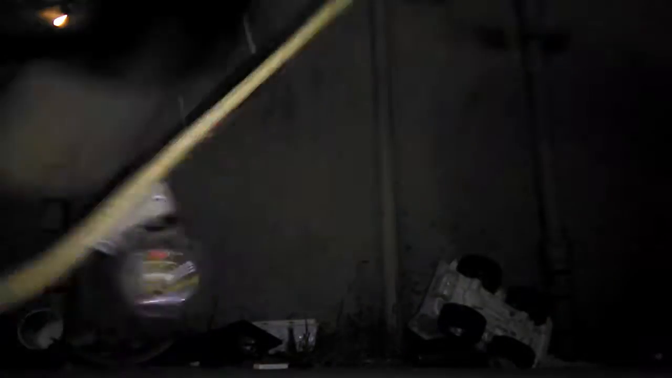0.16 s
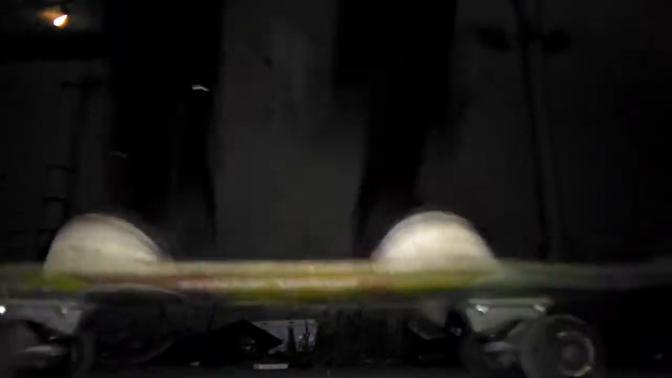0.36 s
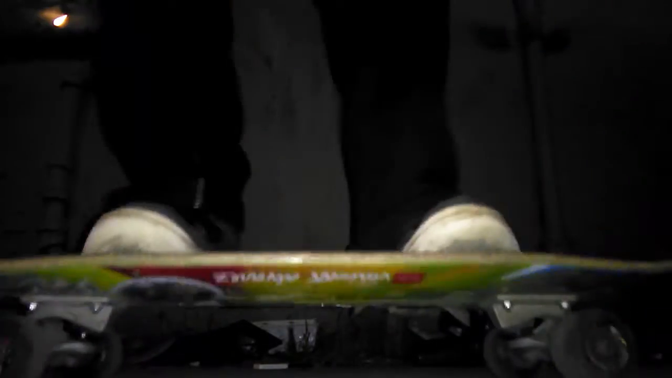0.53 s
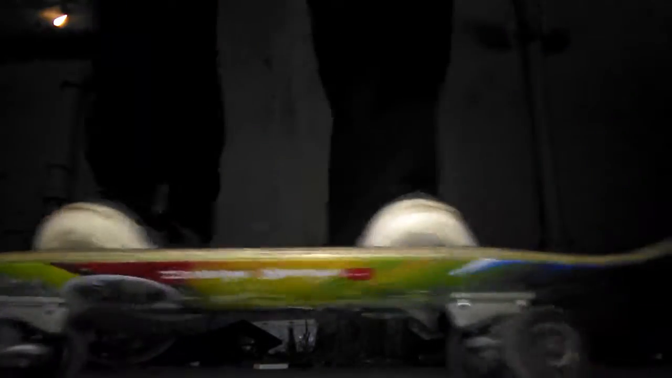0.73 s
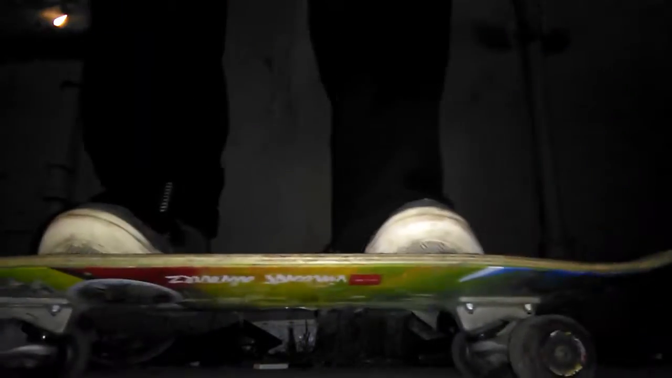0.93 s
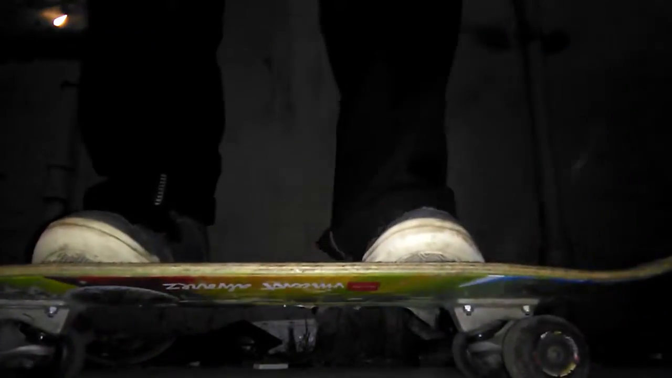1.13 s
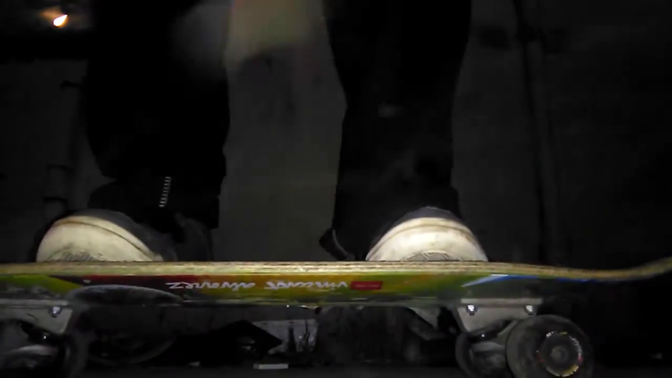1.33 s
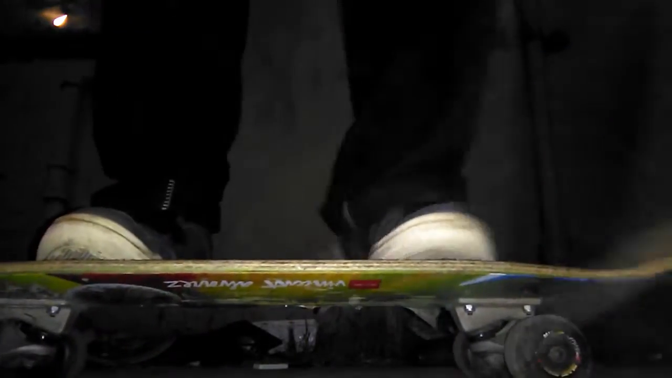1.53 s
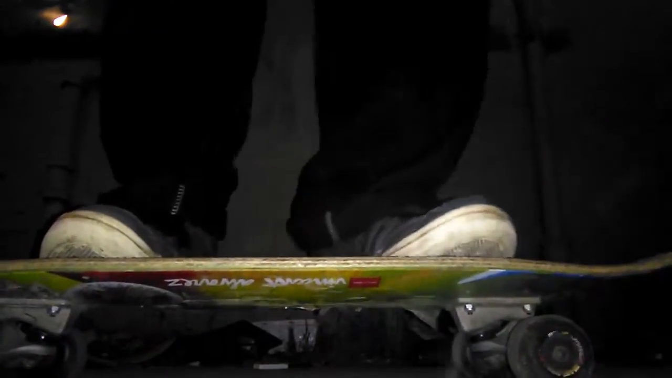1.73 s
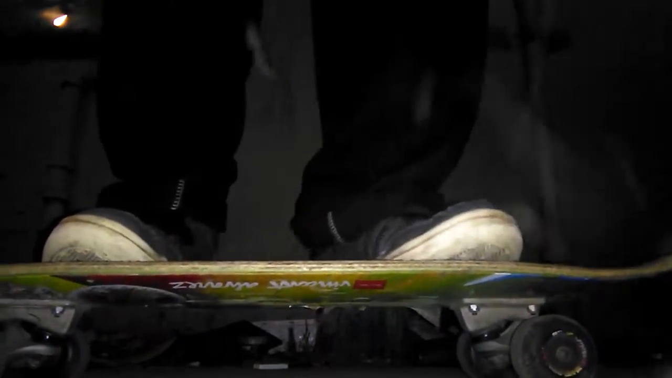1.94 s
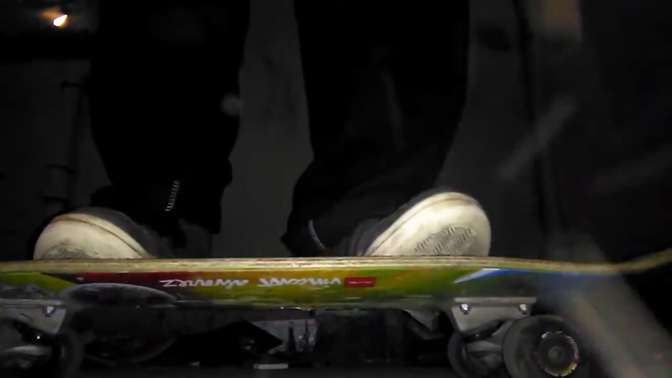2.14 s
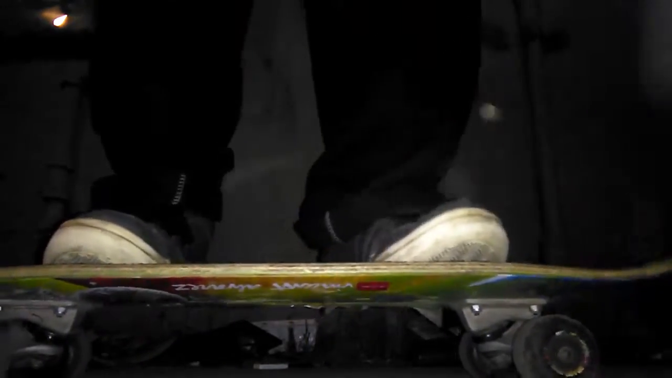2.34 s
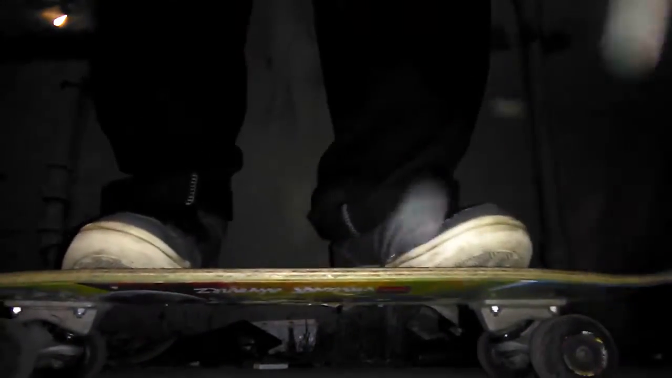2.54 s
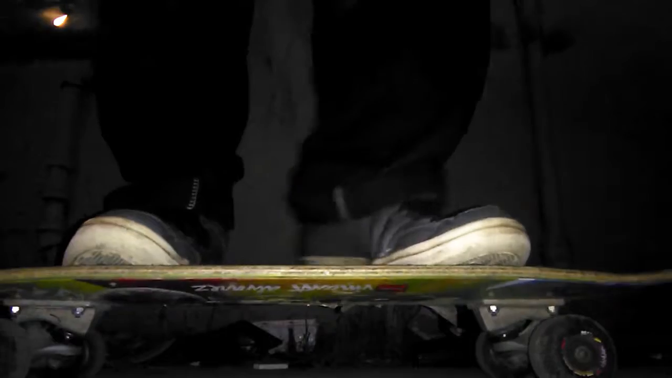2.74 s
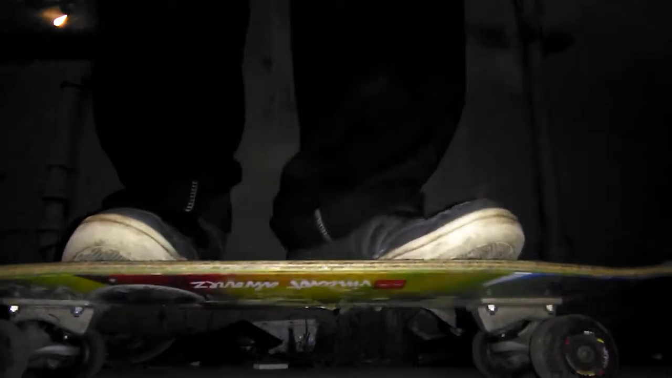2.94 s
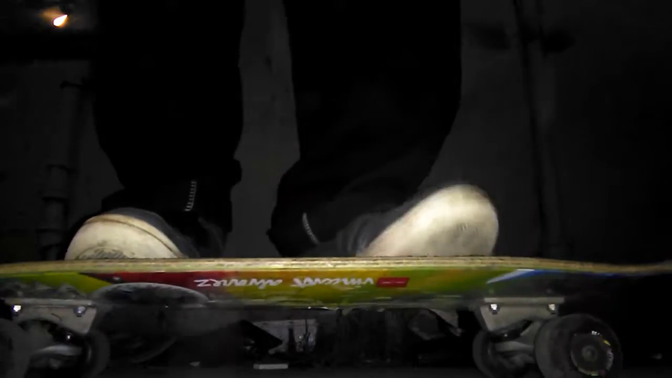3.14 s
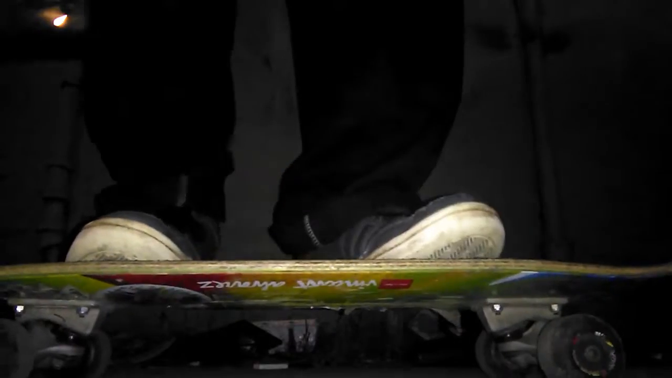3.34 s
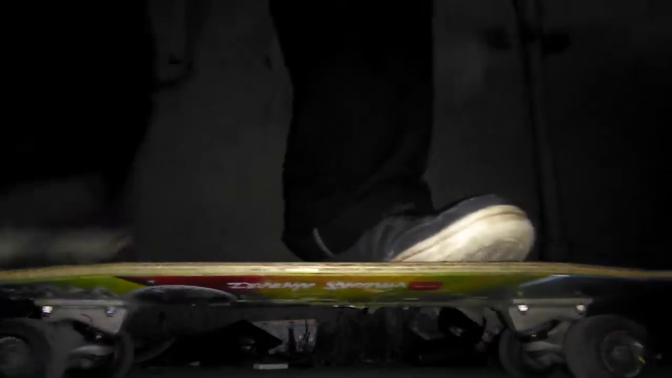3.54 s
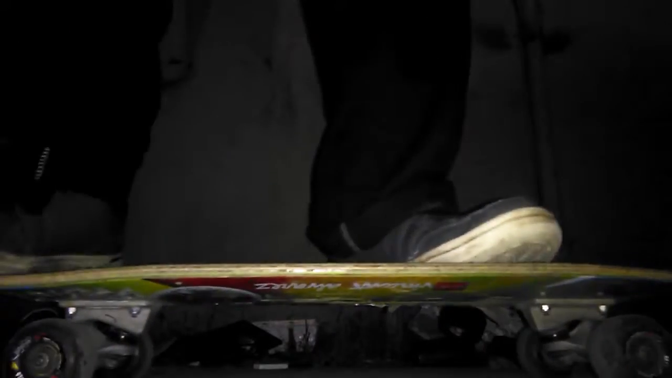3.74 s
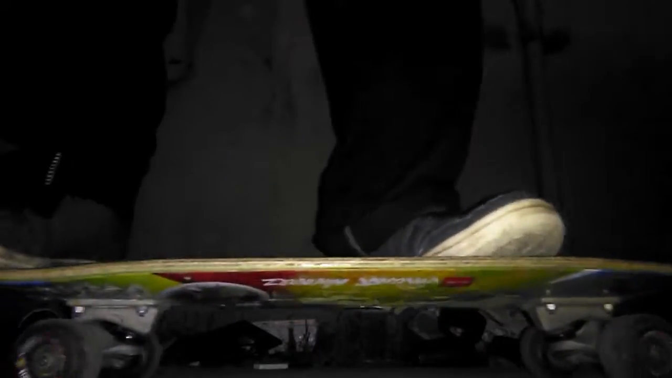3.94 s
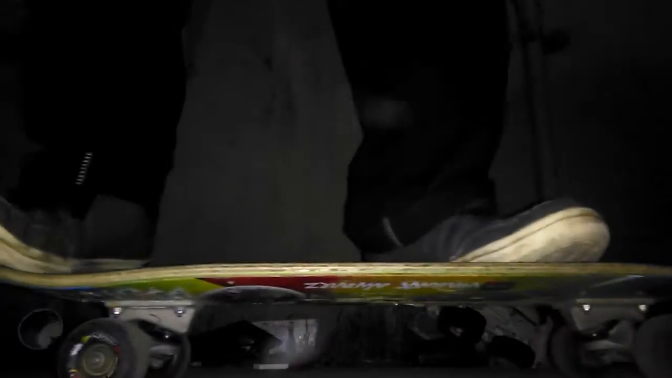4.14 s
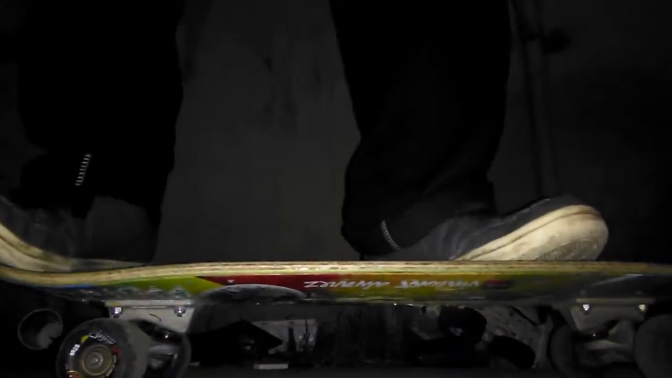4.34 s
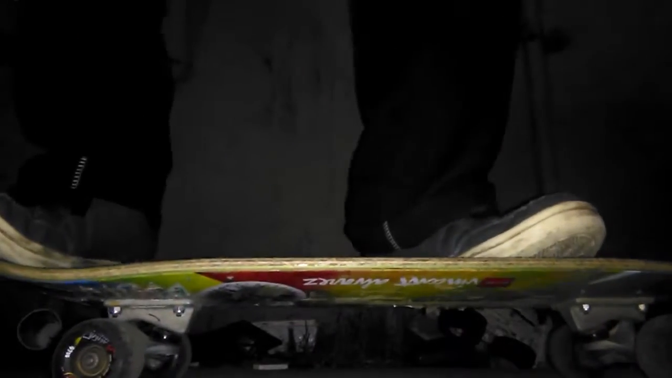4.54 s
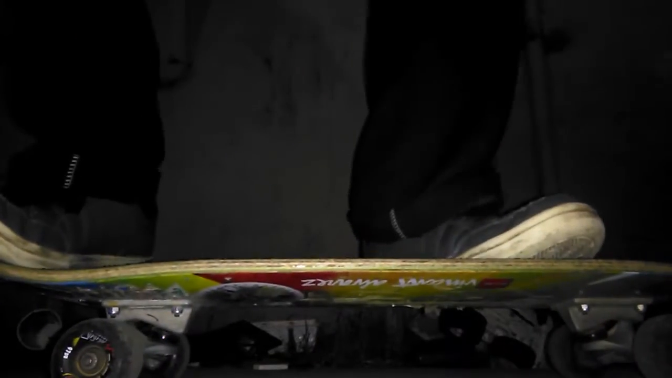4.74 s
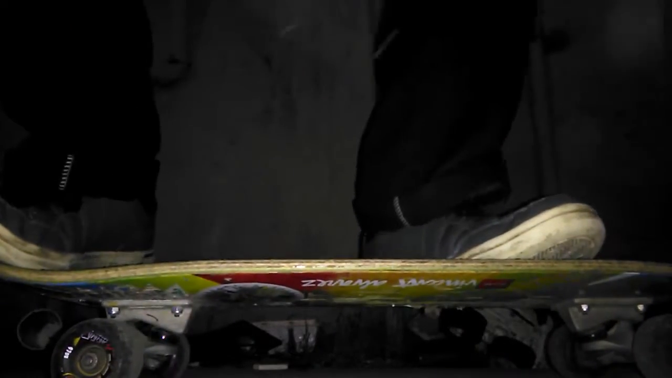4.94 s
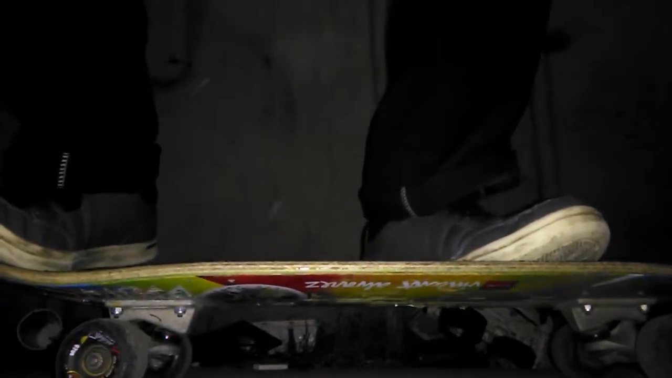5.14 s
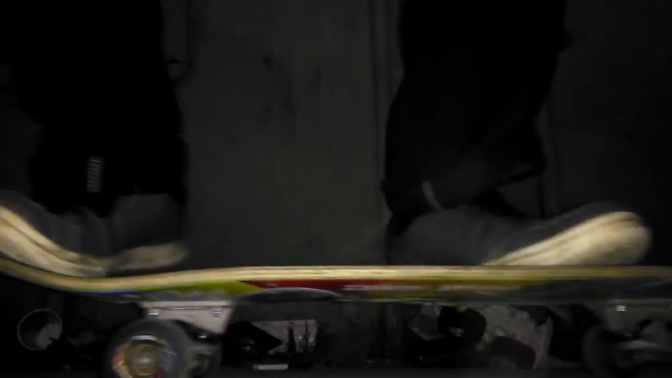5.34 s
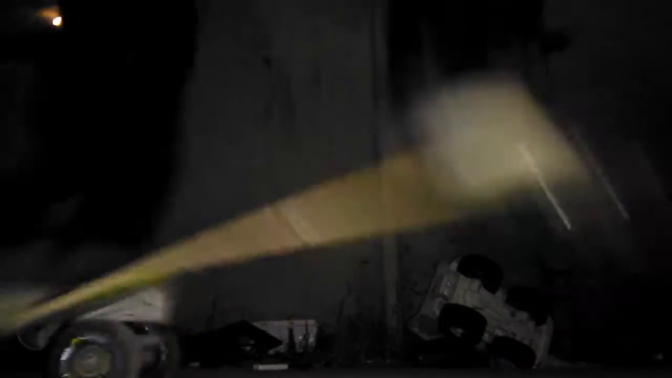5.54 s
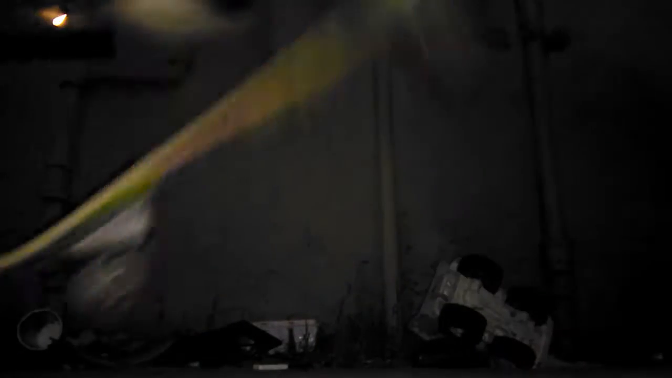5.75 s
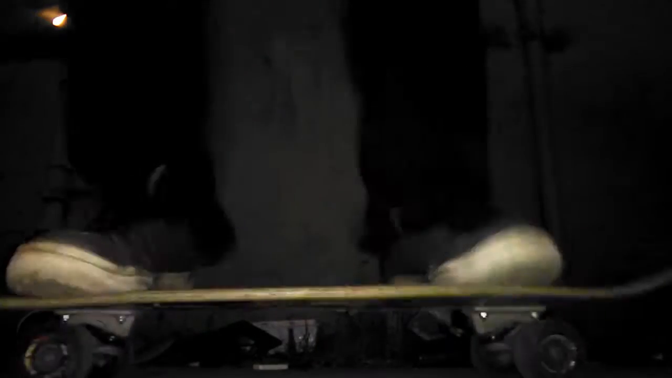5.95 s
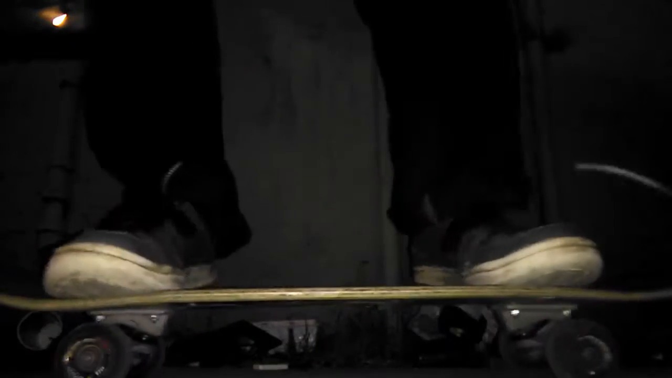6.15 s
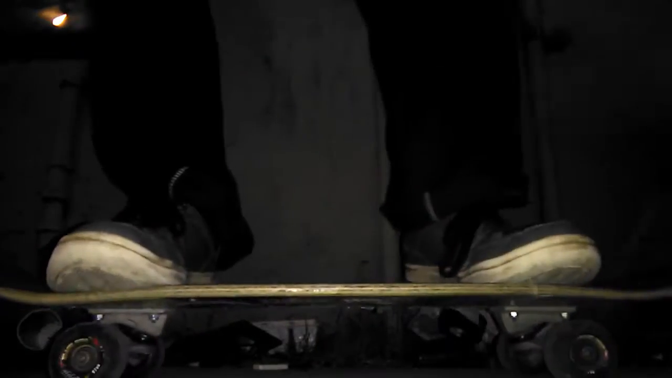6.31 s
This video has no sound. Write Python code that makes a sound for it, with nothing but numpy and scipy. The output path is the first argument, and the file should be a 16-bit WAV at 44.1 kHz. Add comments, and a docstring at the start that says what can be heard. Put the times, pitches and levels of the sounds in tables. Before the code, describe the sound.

A skateboarder jumps two ollies in a small room, with cracking tail pops, booming wheel landings and soles scuffing on grip tape between.

```python
"""A small bare room with a hard floor, heard from wheel height: a skateboarder jumps two ollies.
Each time the board's tail cracks down, then the wheels slam back in a quick clatter that sets the room
booming. In between, the trucks (the axle mounts) knock, and rubber soles scuff and squeak on the
board's rough grip tape. A dull rush of air lies underneath, and a limiter flattens the slams."""
import sys
import numpy as np
from scipy import signal
from scipy.fft import rfft, irfft, next_fast_len
from scipy.io import wavfile
from scipy.ndimage import uniform_filter1d, minimum_filter1d, map_coordinates

SR = 44100
rng = np.random.default_rng(int(sys.argv[2]) if len(sys.argv) > 2 else 0)


def pcm_store(signal):
    """Save signal as 16-bit PCM."""
    levels = np.round(np.clip(np.atleast_2d(signal), -1, 1) * 32767)
    wavfile.write(sys.argv[1], SR, levels.astype(np.int16).T)


N = 281358

# Soles sliding on the grip tape: (start [s], length [s], level [dB])
SCUFF_STROKES = [(0.0, 0.071, -35), (0.077, 0.15, -36), (0.698, 0.16, -39.5), (1.066, 0.11, -52),
                 (1.146, 0.14, -40.5), (1.554, 0.18, -43), (1.926, 0.085, -52.5), (2.088, 0.089, -44.5),
                 (2.318, 0.3, -46.5), (2.746, 0.13, -39.5), (2.914, 0.11, -53), (3.096, 0.094, -42.5),
                 (3.431, 0.15, -53), (3.632, 0.1, -49), (3.763, 0.048, -52.5), (3.884, 0.051, -48.5),
                 (4.121, 0.12, -45), (4.564, 0.093, -53.5), (5.186, 0.24, -48), (5.473, 0.11, -31),
                 (5.593, 0.092, -42.5), (6.187, 0.08, -48)]
# Trucks knocking as the rider's weight shifts: (time [s], level [dB])
TRUCK_HITS = [(0.038, -25), (0.356, -34.5), (0.847, -23), (3.637, -25.5), (3.9413, -27), (5.512, -25.5),
              (5.568, -24.5), (5.588, -25.5), (6.207, -28)]
# The tail hitting the floor: (time [s], clack [dB], crack [dB], boom [dB], rebound delay [s])
TAIL_HITS = [(0.13, -3, -11.5, -15, 0.042), (5.677, -3, -13.5, -24, 0.026)]
# Grit and loose hardware: (time [s], relative level [dB])
GRIT_TICKS = [(0.2666, -18.5), (0.569, -11.5), (0.573, -15), (0.609, -17), (1.6132, -24), (2.2356, -34.5),
              (5.4026, -23), (5.84, -23), (6.116, -20.5), (6.162, -26)]
# The board landing: (time [s], level [dB], centre of the boom under the feet [Hz])
TOUCHDOWNS = [(0.384, -2, 283), (5.92, -1.5, 517)]
# The rocking board setting a wheel down: (time [s], level [dB], click [dB])
WHEEL_HITS = [(0.6754, -19.5, -21), (0.687, -20.5, -26), (0.696, -17.5, -14), (0.702, -17, -40),
              (0.8595, -21.5, -26)]
# Rubber sticking and slipping: (start [s], length [s], first pitch [Hz], last pitch [Hz], level [dB])
RUBBER_SLIPS = [(1.121, 0.068, 776, 978, -39.5), (3.884, 0.045, 1170, 924, -47.5),
                (4.129, 0.082, 1091, 1174, -39.5), (5.444, 0.089, 738, 1134, -36)]

# The tone of each sound, from bass to treble: (frequency [Hz], relative level [dB])
AIR_TONE = [(22, -19), (65, 5), (110, 2.5), (230, -0.5), (500, -5.5), (680, -3), (830, 0.5), (1020, -1.5),
            (1200, -16), (1900, -18), (3000, -31.5), (4500, -35), (7500, -30), (14000, -39.5)]
RASP_TONE = [(500, -30.5), (1200, -11), (1900, -3), (3200, -3), (4500, -4), (5700, -3), (6800, -13),
             (10000, -23), (14000, -41)]
FIZZ_TONE = [(3000, -15), (6500, -6), (8500, -5), (11000, -14.5), (14500, -25.5)]
KNOCK_TONE = [(60, -6), (250, 0.5), (520, 2), (950, -8), (1700, -5), (3200, -18.5), (8000, -46)]
CRACK_TONE = [(800, -15), (2500, -2.5), (4500, -4), (8200, -0.5), (11000, -8), (14500, -16.5)]
CLACK_TONE = [(28, -28), (58, -0.5), (140, -13), (300, -1.5), (600, -0.5), (1100, -2), (1800, -2.5),
              (2500, -5.5), (3300, -13.5), (6000, -21.5), (10000, -28), (15000, -57.5)]
SQUEAK_TONE = [(1200, -31), (2100, 1), (3000, -3), (4300, -5), (5850, 4.5), (7000, -7), (10000, -19)]
# Stiff resonances of the wooden deck and trucks: (frequency [Hz], width [Hz], boost [dB])
DECK_PEAKS = [(1023, 19.3, 1), (1296, 18, 4), (1537, 110, 2.5), (1864, 50, 4), (2246, 48, 7),
              (3570, 160, 2.5), (4100, 136, 4), (5510, 200, 3.5), (7580, 110, 7)]
# Low notes at which board and room ring: (frequency [Hz], relative level [dB], time to fade 60 dB [s])
BOOM_NOTES = [(119, -11.5, .45), (151.5, -6, 0.47), (164.5, -8, 0.36), (193.6, -2.5, 0.26),
              (267, -4.5, 0.37), (293, -5.5, 0.35), (339.6, -8, 0.33), (386, -3, 0.28), (485, -2, 0.36),
              (518.8, -3.5, 0.29), (549.5, -4, 0.4), (587.6, -3, 0.29), (647.4, -5, 0.44),
              (692.6, -0.5, .36), (791, -9.5, 0.39), (955, -10.5, 0.47)]
# How long the room echoes: (frequency [Hz], time to fade 60 dB [s])
ECHO_TIMES = [(100, 0.57), (260, 0.35), (700, 0.47), (1840, 0.33), (5000, 0.33), (13000, 0.36)]
# How alike the left and right sides sound: (frequency [Hz], likeness [-1 to 1])
STEREO_LIKENESS = [(60, 0.8), (290, 0.79), (640, 0.64), (1300, -0.2), (3100, 0.012), (8000, 0.033)]


def amp(db):
    """Turn decibels into a multiplier."""
    return 10 ** (np.asarray(db) / 20)


def unit(x):
    """Scale a sound to an average power of 1."""
    return x / np.sqrt(np.mean(x ** 2) + 1e-20)


def along(points, hz):
    """Read between the rows of a (frequency, value) table, with octaves evenly spaced."""
    freqs, values = np.transpose(points)
    return np.interp(np.log(hz + 1), np.log(freqs), values)


def fade(t, t60):
    """Die away by 60 dB every t60 seconds."""
    return np.exp(-np.log(1000) * t / t60)


def wobble(rate, size):
    """A smooth curve through `rate` random values a second."""
    points = rng.standard_normal(int(size * rate / SR) + 4)
    return map_coordinates(points, [np.arange(size) * rate / SR])


def filtered(x, response):
    """Turn each frequency up or down by response(hz)."""
    size = x.shape[-1]
    padded = next_fast_len(size + 4096)
    return irfft(rfft(x, padded) * response(np.fft.rfftfreq(padded, 1 / SR)), padded)[..., :size]


def noise(tone, size, colour=lambda hz: 0):
    """Stereo noise with a given tone; the two sides are alike in the bass, unrelated in the treble."""
    def shape(hz):
        width = np.arccos(np.clip(along(STEREO_LIKENESS, hz), -1, 1)) / 2
        return amp(along(tone, hz) + colour(hz)) * [np.cos(width), np.sin(width)]
    mid, side = filtered(rng.standard_normal((2, size)), shape)
    return unit(np.array([mid + side, mid - side]))


def add(track, s, sound):
    """Mix a sound into the track, starting at s seconds."""
    start = max(round(s * SR), 0)
    part = track[:, start:start + sound.shape[-1]]
    part += sound[..., :part.shape[-1]]


def room_air(level_db=-45, split_hz=260):
    """A dull rush with a faint hiss; its rumble swells and sinks on its own."""
    air = noise(AIR_TONE, N)
    rumble = filtered(air, lambda hz: 1 / (1 + (hz / split_hz) ** 4))
    return amp(level_db) * (rumble * amp(1.1 * wobble(3.9, N)) + (air - rumble) * amp(wobble(20, N)))


def deck(hz, uneven_db=4, spacing_hz=70):
    """The board's tone in dB: set peaks, plus random ones that differ with each point of contact."""
    peaks = sum(db / (1 + (2 * (hz - centre) / width) ** 2) for centre, width, db in DECK_PEAKS)
    ripple = map_coordinates(rng.standard_normal(size=1000), [hz / spacing_hz], mode="wrap")
    return peaks + uneven_db * ripple * hz / (hz + 900)


def chatter(x, slip_hz=950, glide=0.11, repeat_gain=0.27):
    """Each catch of the rubber partly repeats one slip later, at a drifting rate."""
    n = np.arange(x.shape[-1])
    period = SR / slip_hz * np.exp(glide * wobble(9.7, len(n)))
    repeats = [[repeat_gain ** k * np.interp(n - k * period, n, side) for side in x] for k in range(4)]
    return unit(np.sum(repeats, 0))


def scuffs(grain_db=1.5, jerk_db=2.5, room_db=-12, fizz_db=-8, usual_db=-44):
    """Soles rasp over grit in tiny catches; each stroke swells, fades and leaves a short echo."""
    out = np.zeros((2, N))
    wash = fade(np.arange(SR // 3) / SR, t60=0.45) ** 2
    t = np.arange(SR * 2 // 3) / SR
    for start, length, db in SCUFF_STROKES:
        speed = np.abs(np.sin(np.pi * np.minimum(t / length, 1))) ** 0.68
        echo = np.sqrt(np.abs(signal.fftconvolve(speed ** 2, wash / wash.sum())[:len(t)]))
        catches = unit(amp(grain_db * wobble(700, len(t)) + jerk_db * wobble(68.7, len(t))))
        level = amp(db) * np.hypot(speed * catches, amp(room_db) * echo)
        fizz = amp(fizz_db + 0.29 * (db - usual_db)) * noise(FIZZ_TONE, len(t))  # harder is brighter
        rasp = chatter(noise(RASP_TONE, len(t), deck))
        add(out, start, level * (rasp + fizz))
    return out


def strike(tone, t60, room_db, build_s=0.0037, attack_s=0.0006):
    """One hit on the board: a short burst of noise, then the room's echo, where bass lasts longest."""
    t = np.arange(SR * 2 // 3) / SR
    near, far = np.split(noise(tone, 2 * len(t), deck), 2, axis=1)
    burst = near * fade(t, t60) * (1 - np.exp(-t / attack_s))
    hz, when, bands = signal.stft(far, SR, nperseg=256)  # split up so each band fades at its own pace
    bands = bands * fade(when, along(ECHO_TIMES, hz)[:, None])
    echo = signal.istft(bands, SR, nperseg=256)[1][:, :len(t)]
    return burst + amp(room_db) * echo * (1 - np.exp(-t / build_s))


def knock(knock_db, click_db):
    """With the rider on it, the board knocks without ringing: a short clack and a click."""
    clack = amp(knock_db + 3.5) * strike(KNOCK_TONE, t60=0.058, room_db=-14.5)
    click = amp(click_db + 3) * strike(CRACK_TONE, t60=0.027, room_db=-21)
    return clack + click


def truck_knocks():
    """The trucks knock under shifting weight, each time with a softer metal click."""
    out = np.zeros((2, N))
    for s, db in TRUCK_HITS:
        add(out, s, knock(db, click_db=db - 6))
    return out


def slam(clack_db, crack_db, rattle_db=2):
    """Tail or wheel hits the floor: a woody clack, with a hard snap and bright crack from the trucks."""
    snap = strike(CRACK_TONE, t60=0.0062, room_db=-38)
    crack = strike(CRACK_TONE, t60=0.1, room_db=-15)
    clack = strike(CLACK_TONE, t60=0.13, room_db=-4.5)
    hit = amp(clack_db) * clack + amp(crack_db) * (snap + crack)
    return hit * amp(rattle_db * wobble(250, hit.shape[-1]))  # loose hardware makes it uneven


def boom(centre_hz, focus_db, spread, swell_s):
    """Low notes of board and room swell after a slam; the way it lands favours those near centre_hz."""
    t = np.arange(SR * 2 // 3) / SR
    hz, db, t60 = np.transpose(BOOM_NOTES)[:, :, None]
    boost_db = focus_db * np.exp(-(np.log2(hz / centre_hz) / 0.4) ** 2)
    level = amp(db + boost_db + rng.normal(0, 1.5, hz.shape))
    # The load on the board keeps changing, so no note rings quite steadily.
    phase = rng.uniform(0, 2 * np.pi, hz.shape) + 0.65 * np.array([wobble(38, len(t)) for _ in hz])
    angle = 2 * np.pi * hz * t + phase
    apart = spread * hz / 1000 * rng.standard_normal(hz.shape)  # high notes differ more between ears
    ring = level / np.linalg.norm(level) * fade(t, t60) * (1 - np.exp(-t / swell_s))
    return np.array([np.sum(ring * np.sin(angle + side * apart), 0) for side in (-1, 1)])


def tail_pops():
    """The tail strikes the floor and sets the deck booming; a weaker, brighter rebound follows."""
    out = np.zeros((2, N))
    for s, clack_db, crack_db, boom_db, rebound_s in TAIL_HITS:
        add(out, s, slam(clack_db, crack_db))
        add(out, s, amp(boom_db) * boom(centre_hz=310, focus_db=0.5, spread=0.65, swell_s=0.0054))
        add(out, s + rebound_s, amp(-9.5) * slam(clack_db, crack_db + 5.5))
    return out


def grit_ticks():
    """Grit and loose hardware make tiny bright taps."""
    out = np.zeros((2, N))
    for s, db in GRIT_TICKS:
        add(out, s, amp(db - 8) * strike(CRACK_TONE, t60=0.029, room_db=-15))
    return out


def landings(wheel_gap_s=0.0205, wheel_loss_db=2.5, feet_delay_s=0.062, foot_gap_s=0.031,
             foot_loss_db=4.5):
    """Three quick, hard wheel hits, then the dull weight of each foot; every one adds to the boom."""
    out = np.zeros((2, N))
    for s, db, foot_boom_hz in TOUCHDOWNS:
        for wheel in range(3):
            low = amp(1) * boom(centre_hz=650, focus_db=5, spread=0.65, swell_s=0.0061)
            hit = slam(clack_db=-2 - wheel * wheel_loss_db, crack_db=-6.5)
            add(out, s + wheel * wheel_gap_s, amp(db) * (hit + low))
        for foot in range(2):
            low = amp(-1.5) * boom(foot_boom_hz, focus_db=5.5, spread=0.98, swell_s=0.01)
            hit = amp(-11) * strike(CLACK_TONE, t60=0.092, room_db=0)
            add(out, s + feet_delay_s + foot * foot_gap_s, amp(db - foot * foot_loss_db) * (hit + low))
    return out


def wheel_drops(thump_hz=140):
    """The board rocks and a wheel drops back on the floor: a knock with a dead thump."""
    out = np.zeros((2, N))
    t = np.arange(SR // 8) / SR
    thump = 2 * np.sin(2 * np.pi * thump_hz * t) * fade(t, t60=0.035)
    for s, db, click_db in WHEEL_HITS:
        add(out, s, knock(db, click_db))
        add(out, s, amp(db + 0.5) * thump)
    return out


def squeaks(jitter=0.013, between_db=-8, rough_db=4.5):
    """Rubber sticks and slips at a gliding, unsteady rate, which sets the pitch of the squeak."""
    out = np.zeros((2, N))
    # Every other slip differs, which adds weaker tones halfway between the overtones.
    multiples = np.arange(3, 18)[:, None] / 2
    for s, length, first_hz, last_hz, db in RUBBER_SLIPS:
        progress = np.linspace(0, 1, int(length * SR))
        glide = first_hz + (last_hz - first_hz) * np.sin(np.pi / 2 * progress)
        pitch = glide * (1 + jitter * wobble(686, len(glide)))
        levels = amp(along(SQUEAK_TONE, multiples * last_hz) + between_db * (multiples % 1 > 0))
        flutter = amp([rough_db * wobble(160, len(glide)) for _ in multiples])  # grit upsets each tone
        phase = 2 * np.pi * (multiples * np.cumsum(pitch) / SR + rng.random((2, len(multiples), 1)))
        squeal = unit(np.sum(levels * flutter * np.sin(phase), 1))
        add(out, s, amp(db) * np.sin(np.pi * progress) * squeal)
    return out


def hiss(start_s=4.5, length_s=0.9, level_db=-67):
    """A faint high hiss comes and goes before the second ollie."""
    progress = np.clip((np.arange(N) / SR - start_s) / length_s, 0, 1)
    swell = np.sqrt(np.abs(np.sin(np.pi * progress)))
    return amp(level_db) * swell * noise(FIZZ_TONE, N)


def scene():
    """Board, shoes and room together."""
    board = tail_pops() + landings() + truck_knocks() + wheel_drops() + grit_ticks()
    return board + scuffs() + squeaks() + hiss() + room_air()


def record(dry, hold_s=0.0018, low_cut_hz=38, high_cut_hz=14500):
    """A fast limiter turns the slams down, peaks round off, and the deepest and highest sounds are cut."""
    hold = int(hold_s * SR)
    gain = np.minimum(1, 1 / (np.abs(dry).max(0) + 1e-9))
    held = dry * uniform_filter1d(minimum_filter1d(gain, hold), hold // 2)
    rounded = held / (1 + (held / 0.92) ** 6) ** (1 / 6)
    low_cut = lambda hz: hz ** 4 / np.hypot(hz ** 4, low_cut_hz ** 4)
    return filtered(rounded, lambda hz: low_cut(hz) / (1 + (hz / high_cut_hz) ** 90))


dry = scene()
out = record(dry)
pcm_store(out)
```